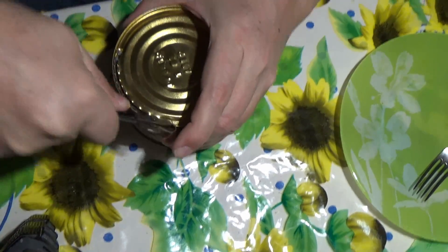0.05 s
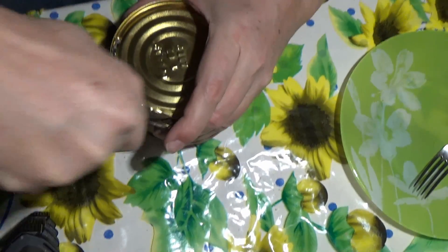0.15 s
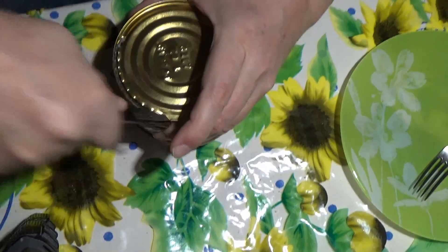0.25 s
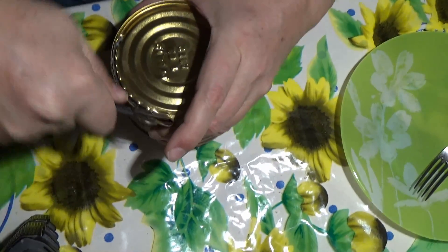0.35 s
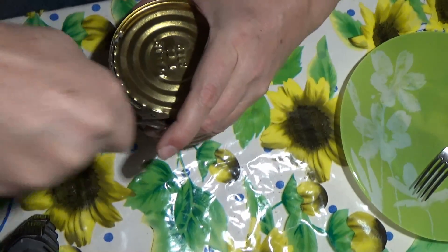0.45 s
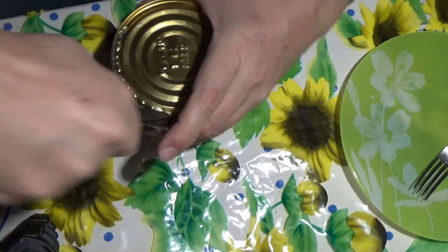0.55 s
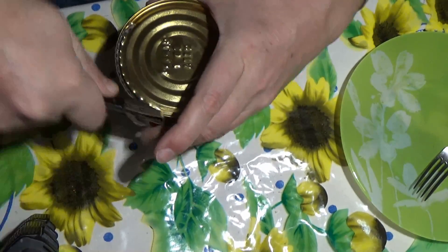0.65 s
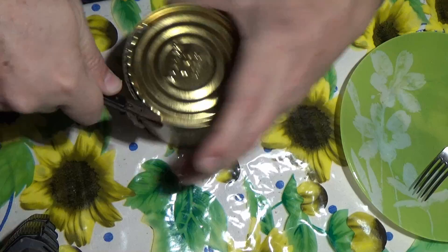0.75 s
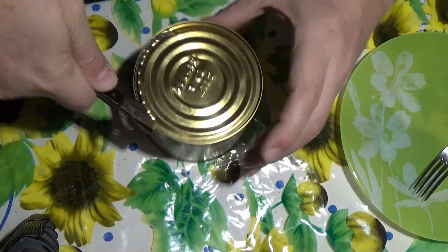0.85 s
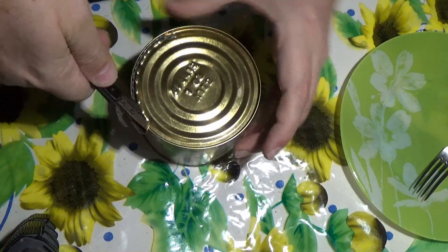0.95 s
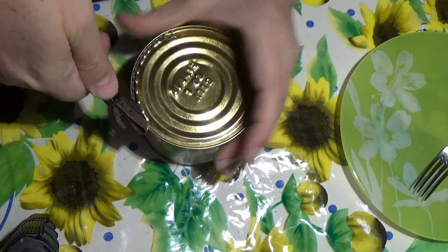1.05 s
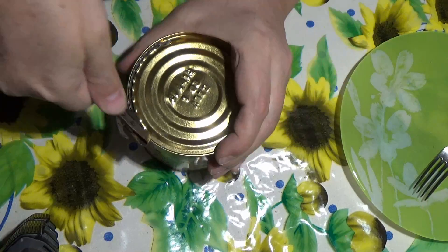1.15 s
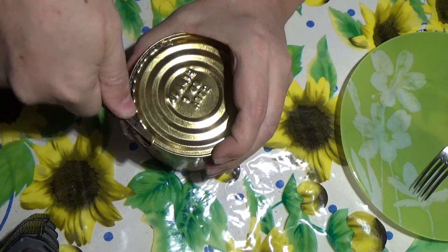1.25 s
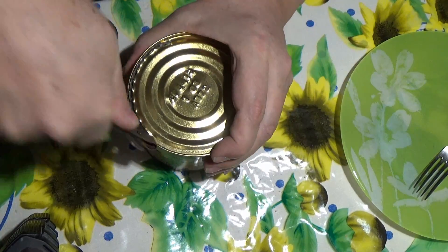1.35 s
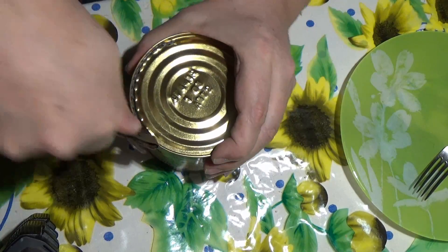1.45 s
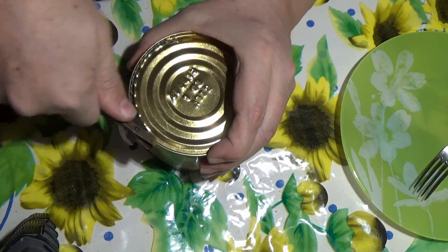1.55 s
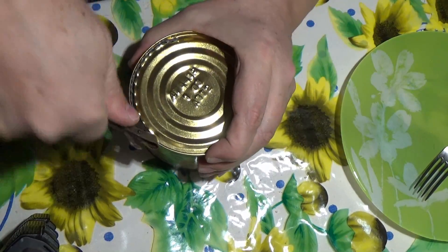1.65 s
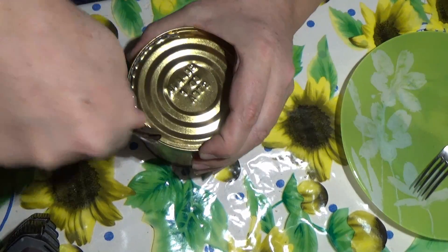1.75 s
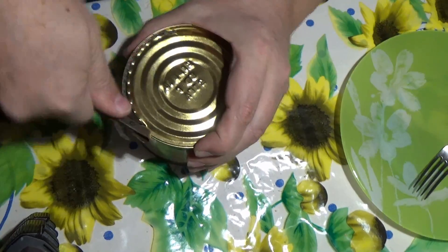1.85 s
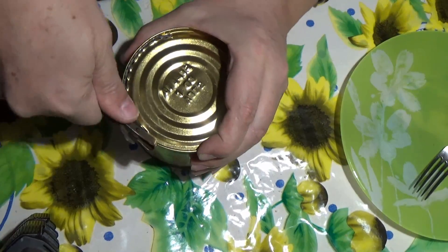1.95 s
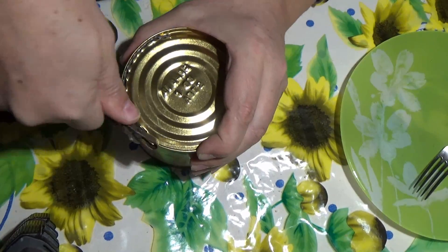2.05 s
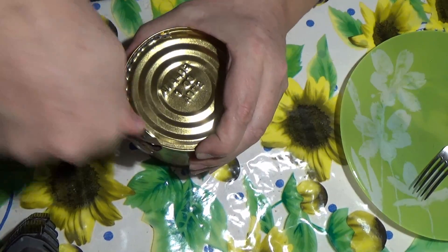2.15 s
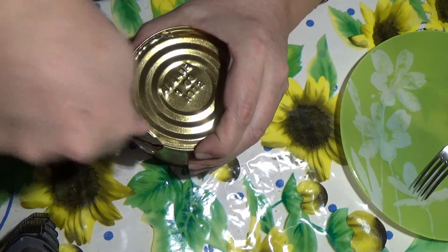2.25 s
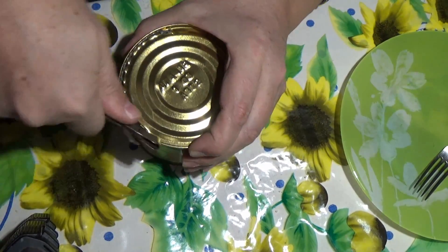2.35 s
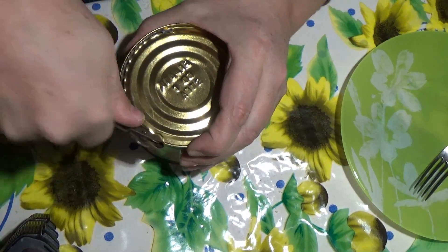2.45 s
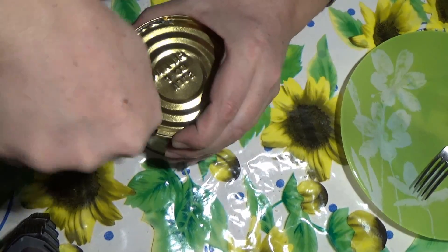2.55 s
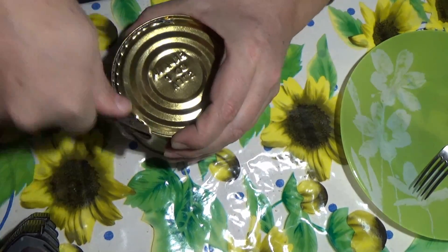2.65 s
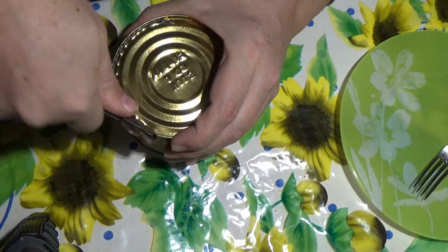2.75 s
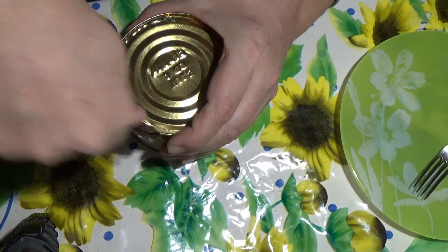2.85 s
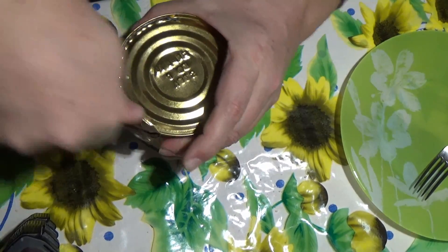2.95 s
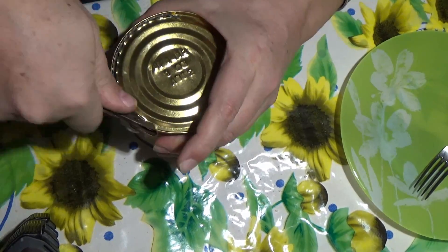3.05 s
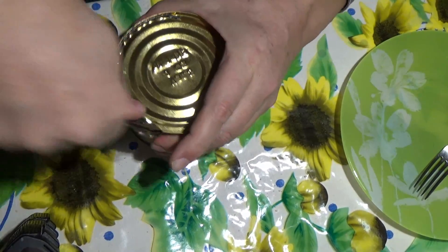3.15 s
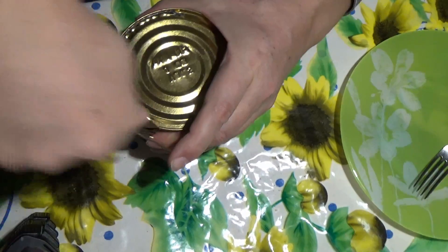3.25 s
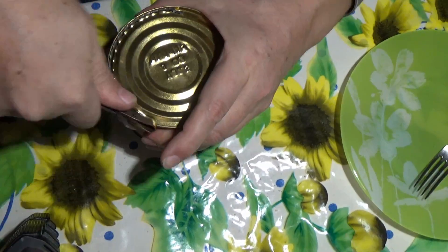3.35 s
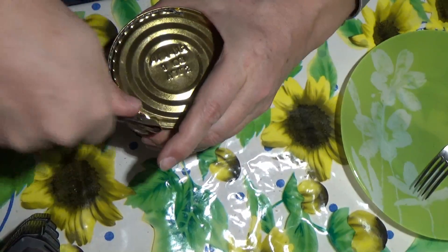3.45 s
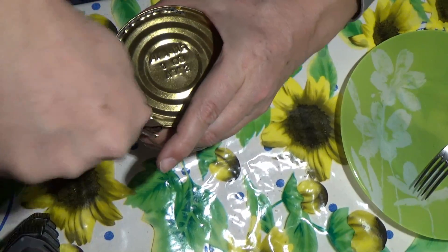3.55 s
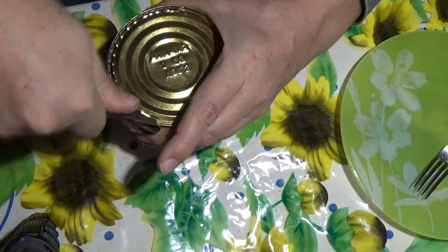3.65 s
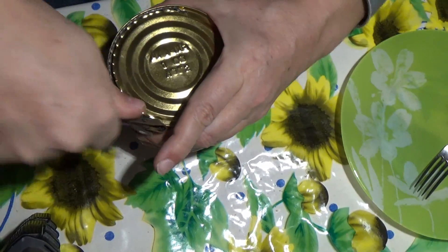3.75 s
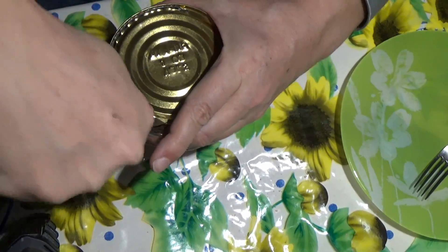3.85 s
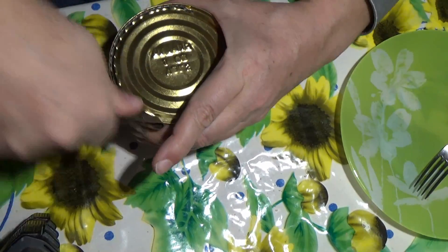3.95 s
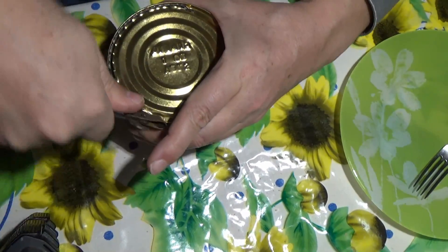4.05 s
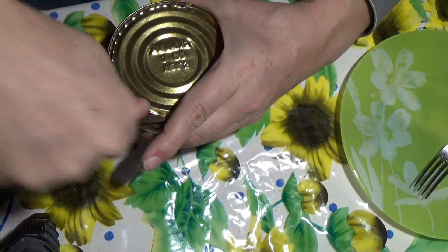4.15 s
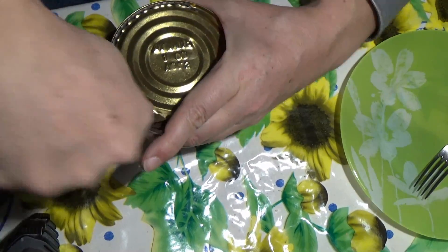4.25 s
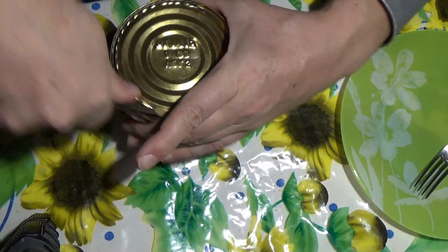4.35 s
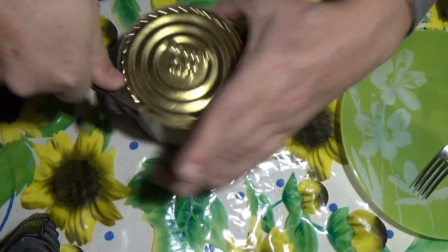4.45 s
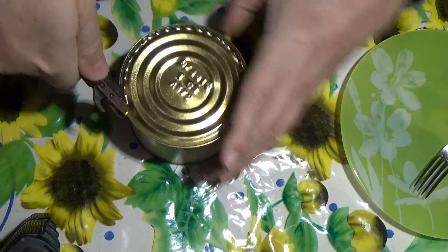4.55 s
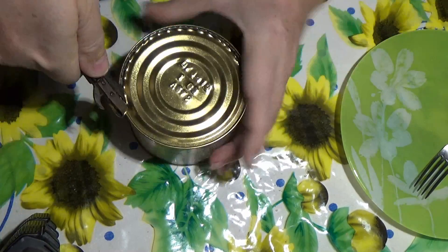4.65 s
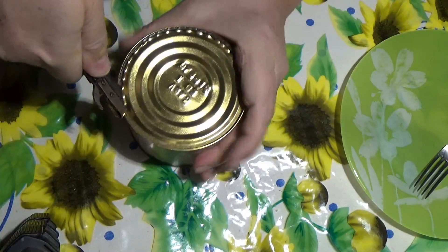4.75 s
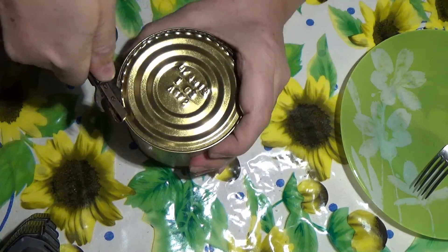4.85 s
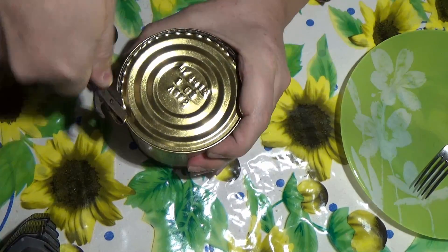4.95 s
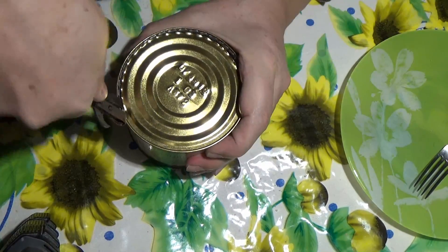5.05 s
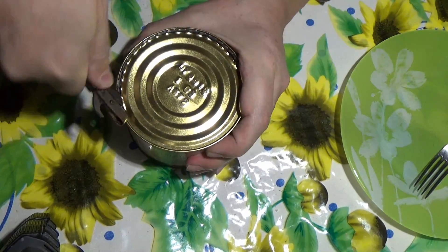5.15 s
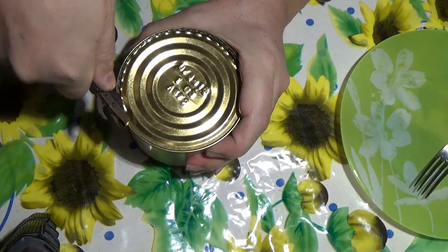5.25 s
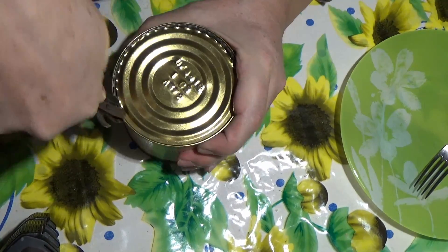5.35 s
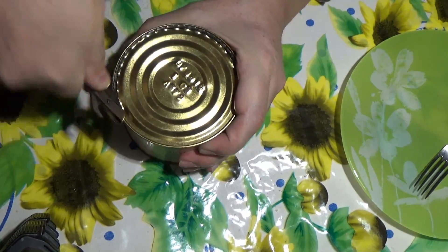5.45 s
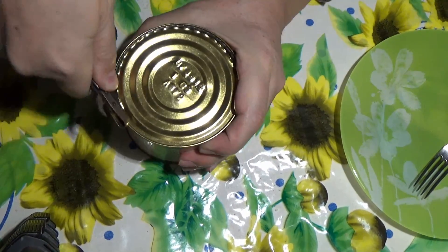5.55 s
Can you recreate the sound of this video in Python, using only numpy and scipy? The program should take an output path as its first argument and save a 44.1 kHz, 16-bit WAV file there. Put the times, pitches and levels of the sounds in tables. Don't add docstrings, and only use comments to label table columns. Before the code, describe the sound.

Close, dry metal scraping and snapping as a hand-worked opener cuts a tin lid in repeated strokes, ending on a heavy crunch.

```python
import sys
import numpy as np
from scipy import signal
from scipy.fft import rfft, irfft, next_fast_len
from scipy.io import wavfile
from scipy.ndimage import uniform_filter1d

SR = 44100
rng = np.random.default_rng(int(sys.argv[2]) if len(sys.argv) > 2 else 0)


def natural_amplitude(level_db):
    exponent = np.asarray(level_db, float) / 20
    return 10 ** exponent


def generate_wav(sig):
    pcm = np.round(np.clip(np.atleast_2d(sig).T, -1, 1) * 32767).astype(np.int16)
    wavfile.write(sys.argv[1], SR, pcm)


N = 246959

# f/Hz, level/dB
ROOM_TONE = [(15, -50), (25, 1), (195, -1.5), (516, -3), (796, 0), (887, 6.5), (1740, -34), (2160, -36.5),
             (2840, -5.5), (6050, -5), (16000, -13)]
# f/Hz, level/dB
PORT_DIFFERENCE = [(60, -9.5), (110, -62), (200, -56.5), (380, -59), (700, -16), (1290, -70), (2380, -43),
                   (4400, -20), (8120, -14.5), (15000, -9.5)]
# t/s, length/s, level/dB
PALM_SLIDES = [(0.667, 0.017, -38.5), (0.738, 0.1, -43), (1.025, 0.183, -44.5), (1.533, 0.0285, -37),
               (2.776, 0.063, -52), (3.984, 0.055, -58), (4.384, 0.14, -42), (4.487, 0.094, -48.5),
               (4.688, 0.092, -43), (0.836, 0.065, -47.5)]
# f/Hz, level per Hz/dB
SKIN_SOUND = [(2000, -22), (4000, -7), (6000, -1), (9000, -6), (14000, -5.5), (16000, -13)]
# f/Hz, level per Hz/dB
BLADE_HISS = [(2060, 7.5), (3500, -2.5), (4970, 0), (6240, 2), (6780, -1.5), (11300, -5), (14000, -10),
              (16000, -11.5)]
# t/s, f/Hz, level/dB
JUDDER = [
    (1.345, 310.6, -32),
    (1.37, 277, -37),
    (1.41, 245, -29),
    (1.44, 236.4, -38),
    (1.47, 228, -30),
]

# t/s, peak level/dB, f/Hz, time to fall 60
# dB/s
PANEL_KNOCKS = [(0.085, -17, 1265, 0.033), (0.133, -17, 1850, 0.06), (0.132, -13.5, 1334, 0.16),
                (0.293, -34, 203, 0.04), (0.312, -8, 345, 0.061), (0.419, -12, 2010, 0.028),
                (0.613, -19.5, 236, 0.073), (0.649, -14, 240, 0.05), (0.692, -21, 870, 0.035),
                (1.205, -30, 243, 0.034), (1.27, -20, 240, 0.031), (1.321, -27, 253, 0.048),
                (1.356, -12.5, 1295, 0.083), (1.544, -19, 509, 0.03), (1.547, -14, 240, 0.045),
                (1.702, -10.5, 1286, 0.054), (1.768, -3, 1244, 0.079), (1.891, -10.5, 1230, 0.052),
                (2.12, -26, 660, 0.044), (2.179, -17, 1080, 0.08), (2.179, -33.5, 520, 0.031),
                (2.338, -17, 1278, 0.047), (2.462, -24, 2030, 0.058), (2.513, -32, 509, 0.038),
                (2.674, -7.5, 335, 0.04), (2.683, -11, 204, 0.044), (2.682, -16, 245, 0.041),
                (2.826, -18, 1990, 0.041), (2.874, -23, 1172, 0.054), (2.994, -24, 1080, 0.044),
                (3.023, -29, 514, 0.052), (3.191, -13.5, 1080, 0.092), (3.308, -20, 350, 0.046),
                (3.334, -20, 280, 0.032), (3.502, -14.5, 525, 0.035), (3.648, -16, 299, 0.066),
                (3.665, -15.5, 244.5, 0.04), (3.978, -19, 263, 0.036), (4.007, -20, 251, 0.052),
                (4.147, -17, 1420, 0.058), (4.341, -15.5, 292, 0.071), (4.523, -24, 526, 0.038),
                (4.818, -24, 245, 0.029), (5.153, -12.5, 288, 0.06), (5.33, -14.5, 1445, 0.064),
                (5.494, -1, 251.7, 0.048),
                (0.356, -20, 501, 0.021), (0.71, -5, 870, 0.016), (1.383, -20, 1890, 0.022),
                (1.27, -17, 242, 0.027), (1.768, -8, 1266, 0.016), (1.778, -9.5, 1300, 0.035),
                (1.78, -9, 880, 0.02), (1.787, -10, 1050, 0.028), (1.789, -11, 1270, 0.025),
                (1.806, -8, 900, 0.025), (1.834, -15, 240, 0.025), (1.897, -17, 920, 0.018),
                (1.903, -6.5, 868, 0.037), (1.92, -7, 202, 0.022), (2.591, -31, 892, 0.018),
                (2.686, -2.5, 757, 0.037), (2.705, -11, 725, 0.035), (2.733, -12, 490, 0.016),
                (3.208, -8, 1080, 0.027), (3.231, -15.5, 502, 0.031), (3.341, -20, 204, 0.034),
                (3.371, -14, 510, 0.023), (4.822, -18, 245, 0.034), (5.333, -9, 1390, 0.017),
                (5.364, -17.5, 509, 0.11), (5.422, -16, 240, 0.035), (5.443, -19, 245, 0.023),
                (5.494, -23, 258, 0.038), (5.507, 1.5, 577, 0.028), (5.511, -12, 200, 0.027),
                (5.519, -5, 542, 0.04), (5.497, -4, 790, 0.025), (5.533, -9, 760, 0.035),
                (.0845, -6, 1960, 0.0058), (0.419, 2.5, 2300, 0.0061), (1.768, -15, 2010, 0.025),
              (2.8262, -9.5, 2245, 0.0065), (4.524, -26, 928, 0.19), (4.525, -20, 2480, .015),
              (5.503, 0, 1911, .022)]
TABLE_BUMPS = [(0.124, -49, 102, 0.18), (0.296, -38, 148, 0.204), (0.639, -50.5, 103, 0.18),
               (1.192, -31, 79, 0.26), (1.541, -42, 129, 0.18), (1.761, -31.5, 113, 0.2),
               (1.882, -21, 106.5, 0.12), (2.396, -28.5, 109, 0.192), (2.662, -25, 120.3, 0.29),
               (3.205, -30.5, 124, 0.333), (3.369, -34, 140, 0.25), (3.712, -33.5, 148, 0.176),
               (4.817, -41, 103, 0.17), (5.137, -33, 120, 0.283), (5.495, -35.5, 122, 0.35)]
# t/s, level/dB
LEVER_CLINKS = [
    (.419, -22.5),
    (1.032, -35),
    (4.816, -22),
]
# f/Hz, level/dB, time to fall 60 dB/s
CLINK_NOTES = [
    [(894, -5.5, 0.067), (1346, -4.5, 0.115), (2140, -7, 0.027)],
    [(890, -3.5, 0.11), (1847, -24, 0.089), (2420, 4, 0.018), (3470, 5, 0.018), (3980, -12, 0.067),
     (4920, 1, 0.0205), (5900, 7, 0.019)],
    [(890, -7.5, 0.16), (1170, -9.5, 0.123), (1427, -5.5, 0.1), (1915, -12, 0.16), (2195, -19.5, 0.081),
     (2470, -11, 0.102), (3840, 1.5, 0.022), (5440, 8.5, 0.0093)],
]

# t/s, tick level/dB, thud level/dB, crack level/dB
RIM_BITES = [(0.084, -12, -41.5, -61), (0.134, -8, -38, -60), (0.288, -38.5, -28.5, -41),
             (.419, -10, -51, -24.5), (0.649, -23, -22, -47), (0.69, -32, -35, -26),
             (0.709, -33, -41, -27.5), (1.198, -20, -20, -31), (1.323, -21.5, -40, -60),
             (1.359, -16, -38, -41), (1.683, -19, -27, -58), (1.763, -11, -47, -43.5),
             (1.769, -4, -47, -55), (1.891, -4, -16, -22), (2.181, -34, -50.5, -50), (2.515, -9, -26, -31),
             (2.584, -9, -45.5, -42), (2.673, -23.5, -25, -32.5), (2.686, -9.5, -28.5, -40),
             (3.191, -17, -32, -42), (3.506, -16, -37, -37), (3.532, -27, -30, -23),
             (3.794, -19.5, -45, -39.5), (4.15, -23, -39.5, -56), (4.524, -23, -40, -44),
             (4.816, -33, -27, -21), (5.494, -26, -18.5, -37), (5.501, -21, -16, -45),
             (5.574, -22, -42, -35), (5.594, -41, -33, -54)]
# t/s, tick level/dB, crack level/dB, f/Hz
LIGHT_TICKS = [(.39, -40, -38, 5200), (.559, -24, -56.5, 5250), (.938, -32, -43.5, 2655),
               (1.002, -50, -51, 5840), (1.031, -24, -41, 2420), (1.268, -27, -41.5, 2270),
               (2.12, -43, -61, 2450), (2.164, -30, -54, 2680), (2.464, -17, -41, 2180),
               (2.516, -18, -49, 11200), (2.788, -38, -39, 2300), (2.827, -11.5, -42, 2100),
               (3.151, -41, -36.5, 1940), (3.467, -34, -37, 1950), (3.769, -40, -32.5, 2290),
               (3.922, -24.5, -55, 5200), (4.104, -18.5, -64, 2020), (4.637, -30, -54, 11000),
               (4.647, -29, -34, 4600), (4.676, -28, -37.5, 5200), (4.943, -26, -60, 12500),
               (4.95, -13, -38, 10900), (5.264, -34, -57, 2440), (5.331, -14, -50, 2020)]
# t/s, length/s, wall level/dB, table level/dB, lid level/dB
PRESSES = [(-0.027, 0.037, -28, -28.5, -23.5), (0.262, 0.094, -27.5, -28, -20),
           (0.595, 0.0737, -37.5, -32, -35.5), (1.136, 0.078, -38, -36, -40.5),
           (1.508, 0.0913, -28.5, -25, -26.5), (2.276, 0.0995, -29.5, -32.5, -30),
           (2.704, 0.04, -30, -32.5, -25.5), (2.959, 0.12, -29, -29, -26.5),
           (3.274, 0.13, -29.5, -29.5, -26.5), (3.612, 0.1065, -28.5, -27.5, -24),
           (3.95, 0.092, -27, -29, -25), (4.306, 0.065, -33, -38, -32), (4.835, 0.016, -37, -36.5, -40),
           (5.112, 0.12, -32.5, -33.5, -29.5), (5.42, 0.14, -33, -40, -27.5),
           (5.508, 0.0416, -32, -28, -47)]
LEVER_BACKS = [(0.106, 0.0645, -29.5, -30.5, -30.5), (0.412, 0.099, -31.5, -34.5, -38),
               (1.242, 0.022, -40.5, -36, -43), (1.33, 0.0706, -31, -33, -43),
               (1.641, 0.1246, -31.5, -39, -33), (1.815, 0.14, -34.5, -36, -48),
               (2.367, 0.027, -28.5, -31, -32.5), (2.844, 0.063, -29, -37.5, -36.5),
               (3.44, 0.062, -38.5, -45, -41), (3.755, 0.11, -34.5, -76, -37.5),
               (4.154, 0.068, -32, -48.5, -34.5), (4.386, 0.012, -33.5, -68, -32),
               (4.983, 0.082, -35.5, -44, -37), (5.27, 0.083, -43.5, -55.5, -42)]
QUICK_GRIPS = [(2.162, 0.069, -29, -38, -29.5), (2.502, 0.061, -24.5, -37, -31),
               (3.189, 0.0383, -25, -42, -31.5), (3.5, 0.061, -33.5, -44, -35.5),
               (5.319, 0.071, -33.5, -43.5, -37)]
# t/s, dying rate/(dB per s), wall level/dB, table level/dB, lid
# level/dB
SUDDEN_JOLTS = [(0.083, 626, -29.5, -25, -57), (0.418, 750.0, -30, -37, -32),
                (0.687, 243.5, -26.5, -70.0, -30.5), (1.029, 1350.0, -42, -44.5, -40),
                (1.321, 830.0, -28, -21.5, -48), (1.758, 146.5, -30.5, -23.5, -36),
                (1.888, 418, -14.5, -18, -23.5), (2.671, 233, -18.5, -21.5, -26),
                (2.825, 665, -26.5, -70, -27), (3.149, 407.5, -35, -37, -47.5),
                (4.096, 300.0, -37.5, -54, -60), (4.144, 390.0, -34, -70.0, -32),
                (4.519, 318.5, -35.5, -40, -39.5), (4.812, 426, -29, -27.5, -35),
                (5.49, 295, -20, -13.5, -14.5),
                (0.122, 400, -39, -42, -33), (.28, 394, -34, -25, -49), (0.644, 402, -29.5, -24, -45),
                 (1.68, 400, -38, -40, -34), (2.161, 300, -52, -54, -41.5), (2.491, 298, -36, -34, -23),
                 (2.654, 100, -31, -30, -38), (3.187, 300, -40, -52, -26.5), (3.502, 302, -26, -52, -27),
                 (4.995, 305, -53, -41, -47), (5.318, 260, -29.5, -53, -43)]
LID_BUCKLES = [(2.114, 350, -40.5, -37, -46), (2.462, 530, -30.5, -54.0, -42), (1.766, 223, -15, -33, -30),
               (2.684, 510, -30, -21.5, -29.5), (5.502, 420, -15, -32, -34)]

# f/Hz, width/Hz, level/dB
TABLE_NOTES = [(79, 11, -13.5), (108.36, 5.7, -4.5), (182.17, 7.5, -0.5), (245, 21.15, 2),
               (285.4, 22.5, -4), (340.7, 60, -5)]
LID_NOTES = [(423.2, 6.1, -11.5), (509, 15.6, 3), (594.3, 4.9, -12.5)]
WALL_SHUT_NOTES = [(720, 17, 2), (819, 10.4, -4.5), (905, 87, 0.5), (927, 11.5, 7), (1005, 13, -0.5),
                   (1272.4, 48, 6.5), (1470, 12, -33.5), (1943.4, 25.4, 3), (1972, 134, -6),
                   (2195, 33, -1.5), (2420, 18, -3.5), (2643.4, 39.6, -5)]
WALL_HALF_NOTES = [(690, 150, -10), (1080, 39.5, 8), (1392, 10.2, -15), (1670, 32, -4), (1990, 20, -1.5),
                   (2237, 78, 4), (2386, 38, 4)]
WALL_OPEN_NOTES = [(795, 66, 0), (885, 14, 11), (933, 30, 7.5), (1090, 50, -7), (1101, 43, 7),
                   (1380, 32, 11.5), (1394, 33.1, 16), (1650, 100, 2), (1940, 129.5, 0.5),
                   (2010, 12, -28.5), (2220, 37, 11), (2375, 34, -8.5)]
RIM_SHUT_NOTES = [(3260, 11, -40), (3322, 58.7, 3), (3900, 29, -9.5), (4040, 52, 0.5), (4450, 10, -15.5)]
RIM_OPEN_NOTES = [(2960, 30, -24), (3373, 50, 1.5), (3662.4, 100, -0.5), (3770, 78, 6.5), (4164, 66, -9),
                  (4600, 55, -3)]
# t/s, share of open-lid notes
LID_OPENING = [(2.7, 0.012, 0.097), (3.5, 1, 0.14), (3.8, 1, 0.32), (4.1, 0.77, 1), (4.44, 0.96, 0.896),
               (4.5, 0.099, 1), (4.9, 0.088, 1), (4.98, 0.8, 1)]
# t/s, share of half-cut notes in wall
HALFWAY = [(2.75, 0), (3.05, 0.62), (3.55, 0.67), (3.85, 0.086)]


def rms_one(x):
    return x / np.sqrt(np.mean(x ** 2) + 1e-20)


def in_time(table):
    s, *columns = np.transpose(table)
    return [np.interp(np.arange(N) / SR, s, c) for c in columns]


def drift(rate, spread_db):
    r = np.exp(-80 * np.pi * rate / SR)
    slow = signal.lfilter([1], [1, -2 * r, r * r], rng.standard_normal(N // 40 + 2002))[2000:]
    gain = natural_amplitude(spread_db * np.clip(rms_one(slow), -2, 2))
    return np.interp(np.arange(N) / 40, np.arange(len(slow)), gain)


def colour(x, spectrum):
    hz, db = np.transpose(spectrum)
    size = next_fast_len(N)
    bins = np.arange(size // 2 + 1) * SR / size + 1
    gain = natural_amplitude(np.interp(np.log(bins), np.log(hz), db))
    return irfft(rfft(x, size) * gain, size)[:N]


def band(x, low_hz, high_hz):
    return signal.sosfilt(signal.butter(2, [low_hz, high_hz], "band", fs=SR, output="sos"), x)


def resonate(x, hz, width_hz):
    r = np.exp(-np.pi * width_hz / SR)
    top = np.array([1, 0, -1]) * (1 - r * r) / 2
    return signal.lfilter(top, [1, -2 * r * np.cos(2 * np.pi * hz / SR), r * r], x)


def stroke(start, length, swell_share, held_db_per_s, release_db_per_s):
    out = np.zeros(N)
    at = slice(max(round(start * SR), 0), round((start + .7) * SR))
    s = np.maximum(np.arange(N)[at] / SR - start, 0)
    swell = np.sin(np.pi / 2 * np.minimum(s / (swell_share * length), 1)) ** 2
    held_db = held_db_per_s * (np.minimum(s, length) - length / 2)
    out[at] = swell * natural_amplitude(held_db - release_db_per_s * np.maximum(s - length, 0))
    return out


def slips(per_s, spread_db):
    sizes = natural_amplitude(spread_db * np.minimum(rng.exponential(1, N), 3.4)) * rng.choice([-1, 1], N)
    return rms_one(sizes * (rng.random(N) < per_s * drift(60, 3.5) / SR))


def following(on_wall, db, share):
    return natural_amplitude(db) * (on_wall / natural_amplitude(-29)) ** share


def hush():
    mid, side = (rms_one(colour(rng.standard_normal(N), ROOM_TONE)) for _ in range(2))
    side = natural_amplitude(-12.5) * band(side, 60, 700)
    return natural_amplitude(-42.5 - 12.5) * (mid + side * np.array([[1], [-1]]))


def kitchen(x):
    t60_s, cut_hz = 0.057, 16000
    size = next_fast_len(N + SR)
    w = 2 * np.pi * np.arange(size // 2 + 1) / size
    dull = 1 / (1 + 1j * w * SR / (2 * np.pi * cut_hz))
    spectrum, out = rfft(x, size), [0, 0]
    for k, lag in enumerate((rng.uniform(0.0068, .03, 12) * SR).astype(int)):
        loop = natural_amplitude(-60 * lag / SR / t60_s) * dull * np.exp(-1j * w * lag)
        out[k % 2] = out[k % 2] + (-1) ** (k // 2) * loop / (1 - loop)
    return np.array([irfft(spectrum * h, size)[:N] for h in out])


def brush():
    level = 0
    for start, length, db in PALM_SLIDES:
        level = level + natural_amplitude(db) * stroke(start, length, swell_share=1, held_db_per_s=-64, release_db_per_s=201)
    return level * drift(40, 2.3) * rms_one(colour(rng.standard_normal(N), SKIN_SOUND))


def groan():
    hz, db = in_time(JUDDER)
    s = np.arange(N) / SR
    sounding = (s > JUDDER[0][0]) * (s < JUDDER[-1][0])
    return natural_amplitude(db) * sounding * np.sin(2 * np.pi * np.cumsum(hz) / SR) * drift(23.4, 4.65)


def rings(rows, trim_db):
    out, s = np.zeros(N + SR // 2), np.arange(SR // 2) / SR
    for start, db, hz, t60 in rows:
        at = round(start * SR)
        out[at:at + SR // 2] += natural_amplitude(db + trim_db - 60 * s / t60) * np.sin(2 * np.pi * hz * s)
    return out[:N]


def lid_pop():
    at_s, half_width_s = 1.764, 0.00026
    return natural_amplitude(-9) * np.exp(-((np.arange(N) / SR - at_s) / half_width_s) ** 2)


def blows():
    clinks = []
    for (start, db), notes in zip(LEVER_CLINKS, CLINK_NOTES):
        clinks += [(start, db + note_db, hz, min(t60, .12)) for hz, note_db, t60 in notes]
    knocks = rings(PANEL_KNOCKS, trim_db=-9.5) + rings(clinks, 0)
    bumps = rings(TABLE_BUMPS, trim_db=-5.5)
    return band(knocks, 137, 9900) + band(bumps, 72, 360) + lid_pop()


def contacts():
    scatter = np.exp(0.083 * rng.standard_normal(len(RIM_BITES)))
    bites = [(s, tick, thud - 9.5, thud, crack, 2180 * k)
             for (s, tick, thud, crack), k in zip(RIM_BITES, scatter)]
    ticks = [(s, tick, -90, -90, crack, hz) for s, tick, crack, hz in LIGHT_TICKS]
    return np.array(bites + ticks)


def strikes(column, trim_db, bounce_s, tone_width=None):
    out, rows = np.zeros(N + 900), contacts()
    shape = np.exp(-np.arange(900) / SR / bounce_s)
    clicks = rng.standard_normal((len(rows), 900)) * (rng.random((len(rows), 900)) < .15)
    clicks[:, 0] = 3
    for row, grain in zip(rows, clicks * shape):
        if tone_width:
            hz, width_hz = row[5], tone_width * row[5]
            grain = resonate(resonate(grain, hz, width_hz), hz, width_hz)
            grain = grain / np.abs(grain).max()
        at = round(row[0] * SR)
        out[at:at + 900] += natural_amplitude(row[column] + trim_db) * grain
    return out[:N]


def slide(level):
    grains = slips(9000, spread_db=-1.0)
    patches = sum(resonate(grains * drift(9, 4.5), hz, .04 * hz) for hz in np.geomspace(4200, 14500, 16))
    hiss = rms_one(colour(grains + 2.8 * patches, BLADE_HISS))
    crack = band(strikes(4, 10.6, bounce_s=0.003), 2600, 10800)
    return level * hiss, crack


def sudden(rows):
    power = 0
    for start, dying, *db in rows:
        shape = stroke(start, 0.0028, swell_share=0.85, held_db_per_s=0, release_db_per_s=dying)
        power = power + (natural_amplitude(np.array(db) - 1)[:, None] * shape) ** 2
    return power


def forces():
    grip_db = np.array((-57, -58, -62))
    release_db_per_s = 342, 161, 320
    kinds = ((PRESSES, (0.6029, -23, -50, -44)),
             (LEVER_BACKS, (0.35, 30, -34, -5)),
             (QUICK_GRIPS, (0.02, 14, -6, -5)))
    power = natural_amplitude(2 * grip_db)[:, None] * drift(8.0, 2.5) ** 2
    pushing = None
    for rows, (swell_share, *held) in kinds:
        for start, length, *db in rows:
            for k in range(3):
                shape = stroke(start, length, swell_share, held[k], release_db_per_s[k])
                power[k] += (natural_amplitude(db[k]) * shape) ** 2
        if pushing is None:
            pushing = power[0].copy()
    power += sudden(SUDDEN_JOLTS)
    on_edge = np.sqrt(power[0])
    on_wall, on_table, on_lid = np.sqrt(power + sudden(LID_BUCKLES))
    return (on_wall, on_table, on_lid, on_edge), pushing / power[0]


def body(force, modes, low_hz, high_hz, broad_db, wander_db=2.5, held=1):
    out = natural_amplitude(broad_db) * band(force, low_hz, high_hz)
    power = natural_amplitude(2 * broad_db) * (high_hz - low_hz)
    for k, (hz, width_hz, db) in enumerate(modes):
        out += (-1) ** k * natural_amplitude(db) * resonate(force * held * drift(7, wander_db), hz, width_hz)
        power += natural_amplitude(2 * db) * width_hz * np.pi / 2
    return band(out, 0.99 * low_hz, 1.02 * high_hz) / np.sqrt(2 * power / SR)


def flex(shell, pushing):
    most_s, smooth_s = 0.00088, 0.068
    shift = most_s * SR * uniform_filter1d(pushing, round(smooth_s * SR))
    return np.interp(np.arange(N) + shift, np.arange(N), shell)


def tin(on_wall, on_table, on_lid, on_edge, pushing):
    rasp = slips(1500, spread_db=3.0)
    wall_open, rim_open = in_time(LID_OPENING)
    half, = in_time(HALFWAY)
    tick = strikes(1, -7.0, bounce_s=0.001, tone_width=0.623)

    table_force = rasp * on_table + strikes(2, 12.2, bounce_s=0.014)
    table = body(table_force, TABLE_NOTES, 65, 760, broad_db=-13.5, wander_db=1.0)
    lid_force = rasp * on_lid + strikes(3, 3.7, bounce_s=0.00063)
    held = natural_amplitude(-7 * pushing)
    lid = body(lid_force, LID_NOTES, 376, 742, broad_db=-14.0, wander_db=-3, held=held)

    wall_force = rasp * on_wall + tick * natural_amplitude(-4.0)
    uncut_force = wall_force * np.sqrt(1 - half)
    shut = body(uncut_force * np.sqrt(1 - wall_open), WALL_SHUT_NOTES, 650, 2800, broad_db=-9.5)
    opened = body(uncut_force * np.sqrt(wall_open), WALL_OPEN_NOTES, 650, 2800, broad_db=-9.5)
    halved = body(wall_force * np.sqrt(half), WALL_HALF_NOTES, 650, 2800, broad_db=-14)

    rim_force = rasp * following(on_edge, -38, 1.12) + tick * natural_amplitude(-8.5)
    rim = body(rim_force * np.sqrt(1 - rim_open), RIM_SHUT_NOTES, 2800, 4800, broad_db=-7)
    rim += body(rim_force * np.sqrt(rim_open), RIM_OPEN_NOTES, 2800, 4800, broad_db=-7)
    return table + flex(lid + shut + halved + opened + rim, pushing) + tick


def scene():
    force, pushing = forces()
    hiss, crack = slide(following(force[3], -39.5 + 1.26 * pushing, 0.995))
    can = tin(*force, pushing) + groan() + hiss + crack + brush() + blows()
    left, right = kitchen(can + natural_amplitude(-1.0) * crack)
    room_side = colour(band(left - right, 70, 18000), PORT_DIFFERENCE) * natural_amplitude(-1.0)
    sway = natural_amplitude(-15.5) * band(can, 40, 3600) * np.log(drift(19.6, 2.65))
    return can + natural_amplitude(-9.0) * (left + right) + (room_side + sway) * np.array([[1], [-1]]) + hush()


def low_pass(x):
    return signal.sosfilt(signal.butter(12, 16500, fs=SR, output="sos"), x)


def record(dry):
    rounded = .9 * np.tanh(band(dry, 40, 20000) / .9)
    top_cut = signal.ellip(14, .1, 50, 15740, fs=SR, output="sos")
    return low_pass(signal.sosfilt(top_cut, rounded))


dry = scene()
out = record(dry)
generate_wav(out)
```